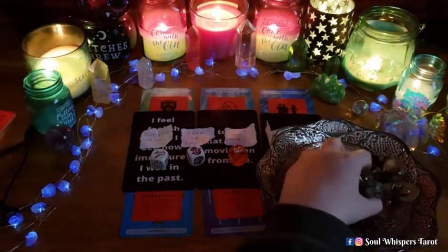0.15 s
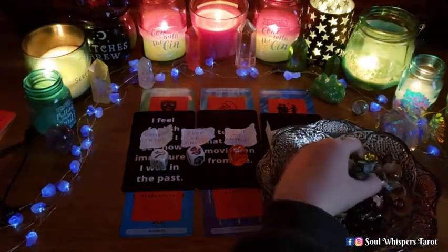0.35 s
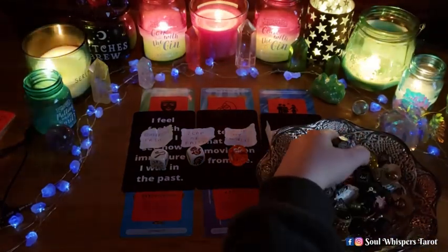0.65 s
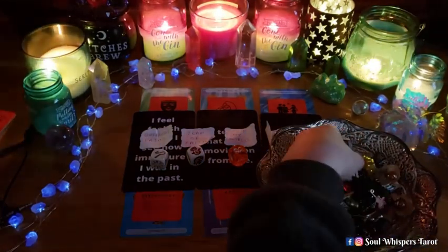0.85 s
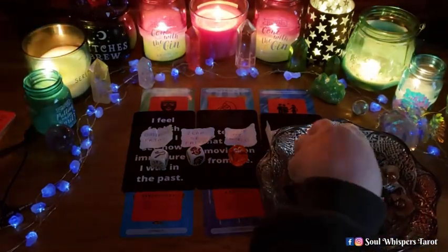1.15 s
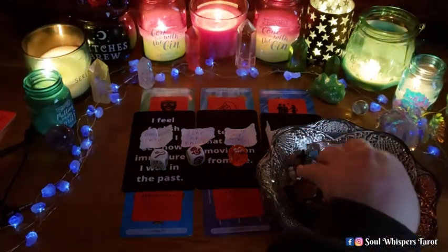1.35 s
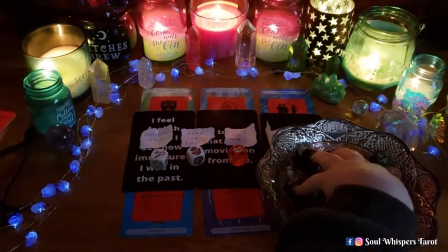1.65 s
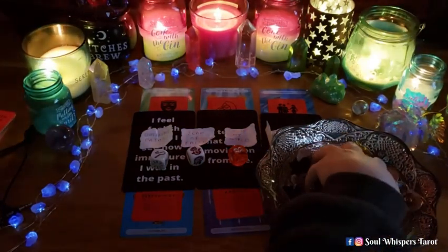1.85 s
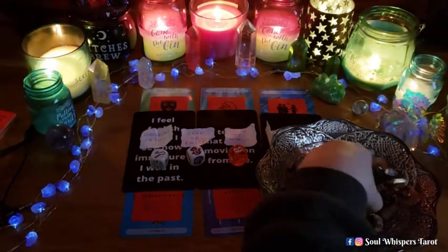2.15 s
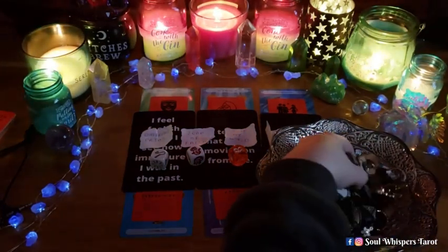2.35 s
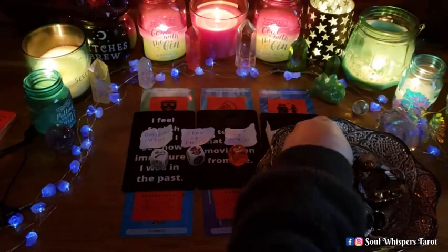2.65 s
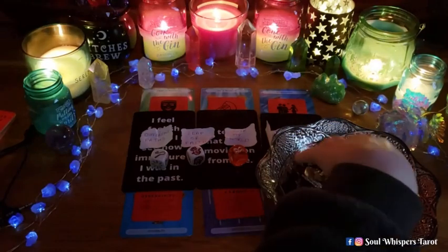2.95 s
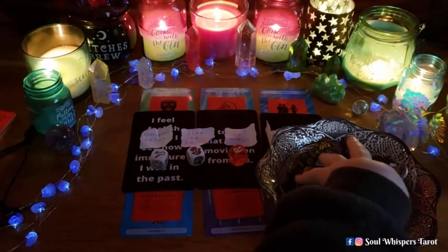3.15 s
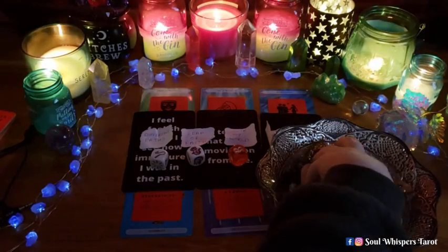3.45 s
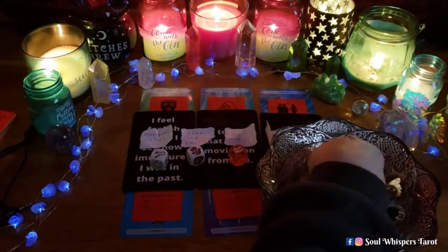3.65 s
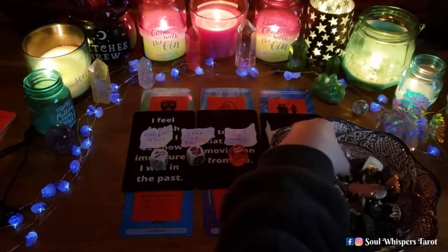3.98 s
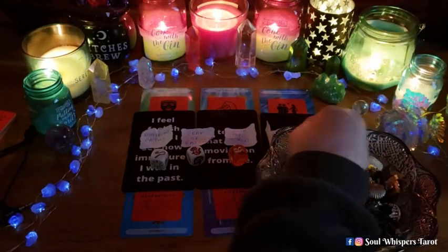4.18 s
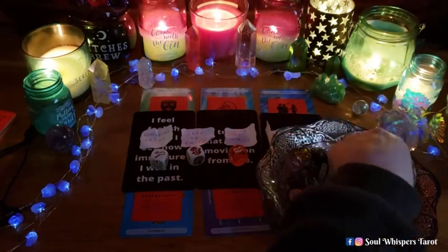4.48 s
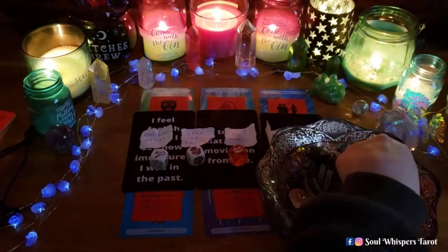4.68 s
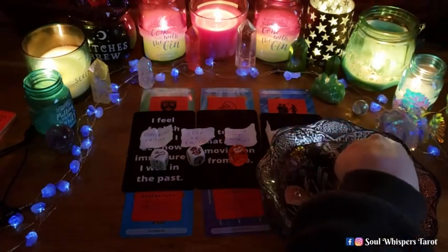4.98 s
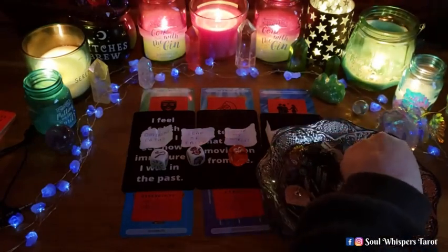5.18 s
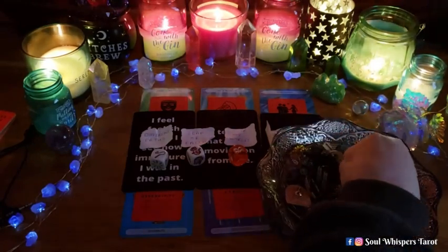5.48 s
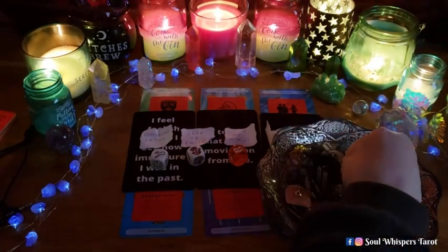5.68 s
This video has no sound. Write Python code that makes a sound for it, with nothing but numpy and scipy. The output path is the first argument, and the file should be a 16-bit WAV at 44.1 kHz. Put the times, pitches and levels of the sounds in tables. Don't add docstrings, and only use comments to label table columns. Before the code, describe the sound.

Fingers rake through small metal charms and stones in a glass bowl on a wooden table. Dense bright jingling starts at once, nearly stops after a second, then returns in uneven surges with hard clinks, stone clacks and dull thumps. It thins towards the end. Small quiet room, very close stereo microphones, brighter and nearer on the left, more reflected on the right.

```python
import sys
import numpy as np
from scipy import signal
from scipy.fft import rfft, irfft, next_fast_len
from scipy.io import wavfile

SR = 44100
rng = np.random.default_rng(int(sys.argv[2]) if len(sys.argv) > 2 else 0)


def to_wav(s):
    ch = np.atleast_2d(s).T
    pcm = np.round(np.clip(ch, -1, 1) * 32767)
    wavfile.write(sys.argv[1], SR, pcm.astype(np.int16))


def undo_db(level):
    steps = np.asarray(level, float) / 20
    return 10 ** steps


N = 256662

# frequency in Hz, level in dB, T60 in seconds.
GLASS_MODES = [(1092, -22, 0.14), (1257.4, -18, 0.18), (1730, -12.5, 0.094), (1680, -21, 0.06),
               (2850, -15.5, 0.055), (3017, -8.5, 0.049), (4393, -3.5, 0.053), (5970, -19.5, 0.1),
               (7600, -15.5, 0.037), (8570, -10, 0.062), (9420, -20, 0.13), (10900, -21, 0.083),
               (12810, -26, 0.07), (11800, -15, 0.088)]
# frequency in Hz, level in dB, T60 in seconds.
TABLE_MODES = [(75, -25, .12), (106, -6.5, 0.12), (128, 1.5, 0.11), (186, 10, 0.13), (236, -8, 0.052)]
# frequency in Hz, level in dB, T60 in seconds.
ROCKING_MODES = [(378.4, 4.5, 0.11), (450.5, 7, 0.054), (571.5, 4, 0.16), (739, 2, 0.047),
                 (878, 2.5, 0.029)]
# frequency in Hz, level in dB, T60 in seconds.
CHARM_MODES = [(9420, -1.5, 0.068), (9860, -4, .04), (10760, 0.5, 0.075), (11300, 3.5, 0.066),
               (11800, 3, 0.076), (12750, -6, .06), (13000, -8, 0.036), (13800, -4.5, .04),
               (14500, -1.5, .04), (15350, -5.5, .04)]
# frequency in Hz, level in dB per Hz.
CHARM_COLOUR = [(6500, -17.5), (7600, -10), (9000, -0.5), (9600, 3.5), (12300, 3.5), (14500, -6.5),
                (15800, -1.5), (17000, 2)]
# frequency in Hz, level in dB per Hz.
STONE_COLOUR = [(1290, -31), (2200, -15), (2920, -5.5), (4120, -1), (4310, -2), (5290, -8.5), (6230, -4),
                (8500, -8.5), (11000, -21), (18700, -120)]
# frequency in Hz, level in dB per Hz.
RUBBING_COLOUR = [(150, -21), (260, -35), (296, -45), (432, 3.5), (611, -2.5), (1720, 0), (2000, 0),
                  (2800, -10), (3640, -26.5), (6160, -120)]
# frequency in Hz, level in dB per Hz.
HUSH_COLOUR = [(18, -42), (30, 9), (124, 5), (616, -11), (2290, -25), (4650, -22), (7500, -26),
               (16000, -11)]
# frequency in Hz, left minus right in dB.
LEFT_LEAD = [(60, 3), (125, 0), (250, 3), (700, 5.5), (1290, 8), (2380, 5.5), (6000, 7), (9000, 13.5),
             (12500, 11), (15500, 4.5)]
LEFT_LAGS = [0, 3, 6, 9]
# frequency in Hz, level in dB.
TABLE_ECHO = [(200, 1), (255, -2.5), (300, -7.5), (350, 0.5)]
# start in seconds, length in seconds,
# charm level at the start in dB, charm level at the end in dB, depth of the dig in dB.
SWEEPS = [(0.04, 0.12, -27, -21, 2.5), (0.19, 0.21, -26, -25, 4.5), (0.452, 0.25, -30.5, -36, -0.5),
          (0.86, 0.267, -24, -19, 1.5), (1.32, .16, -56, -78, -3), (1.588, 0.31, -26.5, -24.5, 2.5),
          (1.952, 0.3, -26.5, -20.5, 1), (2.324, 0.15, -24, -34.5, 2.5), (2.736, 0.042, -23.5, -32.5, -3.5),
          (2.898, 0.058, -24, -26, 0.5), (3.184, 0.19, -20, -31, 1), (3.421, 0.13, -19.5, -28.5, 1.5),
          (3.827, 0.15, -19.5, -29, 0), (4.075, 0.13, -20, -22.5, -5), (4.263, 0.052, -29, -28.5, 1),
          (4.488, 0.11, -27, -23, 0), (4.607, 0.081, -22.5, -30, 0), (4.707, 0.31, -25.5, -34, 0),
          (5.079, 0.13, -34.5, -38.5, -0.5), (5.391, 0.018, -28.5, -33.5, 0), (5.443, 0.11, -37.5, -41, -5),
          (5.754, 0.046, -41.5, -47.5, 1)]
# time in seconds, charm level in dB, rise and fall in seconds
# for 10 dB, depth of the dig in dB.
TUMBLES = [(.004, -15, 0.082, 0.0821, 4.5), (0.125, -15, .004, 0.0461, 2), (.338, -18.5, 0.12, 0.05, -0.5),
           (0.543, -26.5, .004, -0.01, 6.5), (.79, -31, 0.03, -0.29, -7.5),
           (0.834, -22.5, 0.051, -0.1862, -2.5), (1.175, -31, .02, .03, 9), (1.215, -38, .01, .04, 2),
           (1.27, -41, .004, .024, 0), (3.053, -40, .003, 0.03, 0), (3.133, -36, .004, .47, 4.5),
           (5.385, -26, 0.012, -0.06, 3), (5.329, -38, 0.044, -0.25, 0), (5.705, -36, 0.027, -0.5, 5),
           (1.624, -27, 0.026, 0.15, -19), (1.932, -20.5, 0.064, 0.1551, 2), (2.7, -26.5, 0.038, 0.01, 5),
           (2.653, -21.5, 0.099, -0.05, 0), (2.81, -26, .006, 0.04, -4.5),
           (2.852, -12, 0.067, 0.0263, -3.5), (3.68, -20, 0.11, .13, 0.5), (4.03, -26, 0.045, 0.04, -2.5),
           (4.053, -22, .003, 0.04, -3), (5.266, -25.5, 0.069, 0.04, -1.5), (5.6, -33.5, 0.12, 0, -4),
           (5.669, -24, 0.067, -0.15, 0)]
# time in seconds, peak in dB, pitch of the struck piece in Hz,
# share on the glass in dB.
GLASS_KNOCKS = [(0.125, -5.5, 9420, 1), (0.2685, -14.5, 15000, 0), (1.073, -4.5, 9750, -4.5),
                (1.0884, -14, 10700, -14), (1.1004, -26, 10600, -21), (1.1987, -10.5, 12740, -12.5),
                (1.268, -28, 10800, -11), (1.5818, -16, 10700, -12), (1.6146, -11.5, 14900, -4),
                (2.0166, -8.5, 9420, -4.5), (2.1994, -12, 11700, -10), (2.7355, -6, 13500, -14),
                (2.7998, -8.5, 13700, -8), (2.8397, -11, 11900, -8), (2.9278, -13.5, 10300, -14),
                (3.1383, -18, 11100, -10.5), (3.1896, -6.5, 13100, -17), (3.3437, -20.5, 15000, -2),
                (3.4054, -20.5, 11300, -3), (3.678, -25, 15200, -3), (3.8374, -23, 12700, -1),
                (3.9602, -20.5, 15400, -1), (4.3949, -37, 10400, 6.5), (4.4265, -26.5, 5970, 2),
                (4.549, -23.5, 12900, -9), (5.189, -36, 15400, 1.5), (5.378, -32, 11300, 1)]
# time in seconds, peak in dB, pitch in Hz.
CHARM_KNOCKS = [(0.1644, -28, 9300), (0.3294, -24, 13700), (0.5392, -14.5, 8950), (0.647, -18, 11200),
                (0.772, -25, 14000), (0.846, -15, 10300), (1.046, -3.5, 9400), (1.506, -46, 14300),
                (3.052, -24, 13200), (1.5508, -21.5, 11800), (1.546, -28, 13400), (1.799, -35.5, 9370),
                (2.3494, -19, 14200), (2.601, -9.5, 9630), (2.6377, -3, 7130), (4.0499, -7.5, 13200),
                (4.0585, -17, 12660), (4.093, -8, 10100), (4.15, -10.5, 11430), (4.2, -16.5, 13500),
                (4.135, -12.5, 14500), (4.177, -11.5, 6870), (4.2732, -13.5, 14800), (4.469, -32, 10500),
                (4.4945, -25, 11700), (4.6, -16.5, 9410), (4.918, -22.5, 11700), (5.0786, -31, 14300),
                (4.7057, -20.5, 13600), (5.1997, -30, 12900), (2.3396, -15, 14800), (5.599, -22.5, 11900),
                (5.7538, -22, 15350)]
# start in seconds, length in seconds, pitch in Hz, level in dB.
STONE_ROLLS = [(0.385, 0.033, 3420, -34), (0.574, 0.036, 4170, -32), (0.691, 0.032, 4300, -37),
               (5.111, 0.027, 3600, -37), (5.2, 0.022, 4550, -33.5), (5.468, .04, 3930, -34.5),
               (0.854, 0.03, 4400, -24.5), (0.904, 0.03, 3740, -21.5), (1.029, 0.069, 4170, -22.5),
               (2.169, 0.094, 3750, -25), (2.28, 0.078, 3730, -24.5), (2.39, 0.09, 3730, -30.5),
               (3.419, 0.053, 3730, -23), (3.621, 0.17, 3720, -29), (3.895, 0.1, 3700, -28.5),
               (4.489, 0.045, 3850, -28), (4.535, 0.097, 3600, -26.5), (5.596, 0.046, 3500, -34.5)]
# start in seconds, length in seconds, level in dB.
PEBBLE_ROLLS = [
    (0.323, 0.046, -28),
    (2.601, 0.015, -23.5),
    (2.64, .04, -23),
    (2.736, 0.073, -25),
    (2.816, 0.078, -22.5),
    (4.057, 0.068, -21),
    (4.147, 0.054, -21),
    (5.607, 0.08, -39),
]
# start in seconds, pitch in Hz, T60 in seconds, level in dB.
RINGS = [(.004, 8400, 0.045, -26), (0.126, 4388, 0.2, -16), (1.59, 4100, 0.11, -31),
         (.127, 9420, 0.045, -15.5), (0.268, 4390, 0.15, -18.5), (.642, 11170, .12, -27),
         (.715, 11170, .1, -31), (0.22, 9000, 0.069, -33), (0.37, 15000, .06, -24),
         (.13, 8550, 0.06, -23.5), (1.07, 6330, 0.039, -17.5), (1.199, 13050, 0.12, -26),
         (1.2, 8250, .06, -36), (1.27, 2950, .2, -51), (1.29, 4390, .2, -54), (1.27, 900, .15, -60),
         (4.3, 12000, 0.14, -33), (2.4, 14000, 0.087, -23), (2.6, 14600, 0.055, -20),
         (2.32, 14700, .06, -23), (2.37, 14600, 0.04, -27), (2.43, 14500, .04, -31),
         (3.83, 4390, 0.052, -25.5), (3.765, 9700, 0.087, -31), (3.83, 11000, 0.058, -29),
         (3.5, 12810, 0.11, -29), (3.96, 15350, .06, -30), (2.8, 8800, 0.15, -29), (0.36, 9200, .07, -24),
         (4.59, 9420, .1, -27), (6.2, 9420, .06, -26), (5.4, 11700, .1, -35), (0.16, 1728, 0.086, -30),
         (0.32, 1728, .1, -37), (2.8, 1720, 0.053, -34), (3.8, 1728, 0.085, -32), (4.428, 1730, 0.065, -42),
         (3.4, 11000, .06, -27), (2.4, 12000, .15, -34), (.775, 14000, .06, -35),
         (2.016, 1740, 0.032, -23.5), (2.025, 4390, .08, -22), (2.017, 2980, 0.08, -26.5),
         (2.43, 9700, 0.091, -33), (2.93, 10350, 0.18, -28), (3.5, 12000, .2, -30),
         (4.19, 14000, 0.12, -22), (3.96, 8200, 0.14, -35), (1.07, 10700, 0.073, -14.5),
         (.86, 9420, 0.15, -22.5), (5.753, 5750, 0.034, -42.5), (5.75, 17000, .06, -27.5),
         (5.755, 9900, 0.053, -41), (5.62, 14700, 0.077, -25), (5.749, 15350, 0.055, -23.5)]
# start in seconds, pitch in Hz, level in dB.
SCUFFS = [
    (2.017, 3000, -20.5),
    (4.272, 1900, -23),
    (4.274, 1090, -32),
    (4.423, 3950, -29.5),
]
# start in seconds, length in seconds, level in dB.
SHOVES = [
    (1.148, 0.05, -45),
    (1.997, 0.26, -45),
    (2.81, .17, -41.5),
    (3.122, .1, -45.5),
    (4.178, 0.062, -43),
    (4.358, 0.046, -48),
    (4.75, 0.2, -43),
    (5.598, .11, -42),
]
# time in seconds, level in dB.
LEAN = [(0, -1.5), (.35, -1), (.75, -3.5), (1.0, 1.5), (1.18, 5), (1.27, -0.5), (1.55, 1), (1.9, 1),
        (2.2, 1.5), (2.5, 0.5), (2.8, 3.5), (3.15, 6.5), (3.5, -1.5), (3.8, 1.5), (4.2, 7), (4.42, 1.5),
        (4.6, 0.5), (5.3, -3), (5.82, -2)]
# time in seconds, peak in dB.
THUMPS = [(0.175, -32), (0.58, -28.5), (0.876, -28), (1.032, -25), (1.558, -32.5), (1.659, -34),
          (1.881, -28), (1.951, -25), (2.176, -30), (2.227, -27), (2.637, -25), (2.802, -24), (2.867, -23),
          (3.053, -31), (3.166, -27), (3.675, -34), (4.032, -31), (4.175, -25.5), (4.264, -28),
          (4.485, -31), (4.722, -32.5), (5.268, -44)]

SWEEP_RISE_S, SWEEP_FALL_S = 0.03, 0.037
USUAL_DB, GENTLE_DB = -24.5, -46
# dB re charms at a usual stir, dB won per dB gentler, dB won per dB of depth.
STONES, BOWL, WOOD = (-4, 0.21, 0.64), (-13, 0.46, 1), (-15, 0.58, 1.04)
BOWL_FEELS = 0.17
KNOCK_T60_S, CHARM_ON_GLASS_DB = 0.056, -22.5
STONE_T60_S, PEBBLE_HZ, PEBBLE_T60_S = 0.012, 6845, 0.012
CHATTER_S, SCUFF_S, SCUFF_T60_S, SHOVE_HZ, SHOVE_T60_S = 0.033, 0.009, 0.0032, 101.6, 0.2
THUMP_DB, HUSH_DB = -9, -67
ROOM_T60_S, ROOM_LEFT_DB, ROOM_RIGHT_DB = 0.18, -5, 11
BASS_CUT_HZ, TOP_HZ = 78.5, 15800


def rms(x):
    return np.sqrt(np.mean(x ** 2) + 1e-20)


def colour(x, points, share=1):
    size = next_fast_len(N)
    hz = np.maximum(np.arange(size // 2 + 1) * SR / size, 1)
    point_hz, point_db = np.transpose(points)
    db = np.interp(np.log(hz), np.log(point_hz), point_db)
    return irfft(rfft(x, size) * undo_db(share * db), size)[:N]


def ring(clicks, hz, t60):
    radius = undo_db(-60 / (max(t60, .001) * SR))
    turn = 2 * np.pi * hz / SR
    return signal.lfilter([0, np.sin(turn)], [1, -2 * radius * np.cos(turn), radius ** 2], clicks + 1e-18)


def wander(per_s, at=np.arange(N)):
    steps = rng.standard_normal(900)
    return np.interp(at * per_s / SR, np.arange(900), steps)


def level(x, gain, db):
    return x * rms(gain) / rms(x) * undo_db(db)


def train(events, db):
    clicks = np.zeros(N)
    clicks[(np.array(events)[:, 0] * SR).astype(int)] = undo_db(db)
    return clicks


def knock_rows():
    rows = GLASS_KNOCKS + [(s, db, hz, CHARM_ON_GLASS_DB) for s, db, hz in CHARM_KNOCKS]
    return [(s, db, hz, KNOCK_T60_S, glass_db) for s, db, hz, glass_db in rows]


def hand():
    now = np.arange(0, N, 32) / SR
    moves = [(s, length, db, end_db, SWEEP_RISE_S, SWEEP_FALL_S, depth)
             for s, length, db, end_db, depth in SWEEPS]
    moves += [(s, .001, db, db, rise, fall, depth) for s, db, rise, fall, depth in TUMBLES]
    weights = []
    for s, length, db, end_db, rise, fall, _ in moves:
        end = s + length
        times = [s - 3 * rise, s - 1.5 * rise, s, end, end + 10 * max(fall, .005)]
        move_db = np.interp(now, times, [db - 70, db - 15, db, end_db, end_db - 100])
        weights.append(undo_db(4 * move_db))
    weight = np.array(weights)
    total = weight.sum(axis=0)
    charm_db = 5 * np.log10(total)
    depth = np.array(moves)[:, -1] @ weight / total
    gentler = USUAL_DB - np.maximum(charm_db, GENTLE_DB)
    lean_db = np.interp(now, *np.transpose(LEAN))
    gains = []
    for (db, soft, deep), share in zip([(0, 0, 0), STONES, BOWL, WOOD], [0, 0, BOWL_FEELS, 1]):
        layer_db = charm_db + db + soft * gentler + deep * depth + share * lean_db
        gains.append(undo_db(np.interp(np.arange(N) / SR, now, layer_db)))
    return gains


def collisions(gain, per_s, spread_db, clump_db):
    born = rng.random(N) < per_s / SR
    sizes = undo_db(spread_db * np.minimum(rng.exponential(1, N), 3.5) + clump_db * wander(35.0))
    clicks = born * sizes * rng.choice([-1, 1], N)
    return gain * clicks / rms(clicks)


def heap(clicks, low_hz, high_hz, t60, turnover_db, count):
    dealt, out = rng.integers(0, count, N), np.zeros(N)
    for k, (place, damping) in enumerate(rng.random((count, 2))):
        hz = low_hz + (high_hz - low_hz) * (k + place) / count
        length = t60 * undo_db(8 * (damping - .5))
        hit, drive = np.flatnonzero(clicks * (dealt == k)), np.zeros(N)
        drive[hit] = clicks[hit] * undo_db(turnover_db * wander(9.0, hit))
        out += ring(drive, hz, length) / np.sqrt(length)
    return out


def body(clicks, modes, uneven_db):
    hit, out = np.flatnonzero(clicks), np.zeros(N)
    for hz, db, t60 in modes:
        drive = np.zeros(N)
        drive[hit] = clicks[hit] * undo_db(db + uneven_db * rng.standard_normal(len(hit)))
        out += ring(drive, hz, t60)
    return out


def charms(gain):
    fine = collisions(gain, 2000.0, spread_db=0.5, clump_db=2.0)
    single = collisions(gain, 300.0, spread_db=1.0, clump_db=3.0)
    pieces = heap(fine, 7500, 16200, 0.024, turnover_db=2.0, count=56)
    out = level(colour(pieces, CHARM_COLOUR), gain, -1.1)
    out += level(body(single, CHARM_MODES, uneven_db=4.0), gain, -3.5)
    return out + level(colour(fine, CHARM_COLOUR), gain, 2.26)


def stones(gain):
    coarse = collisions(gain, 2000.0, spread_db=3.4, clump_db=2.0)
    on_glass = collisions(gain, 250.0, spread_db=3.0, clump_db=5.0)
    pieces = heap(coarse, 2243, 8543, 0.028, turnover_db=1.5, count=32)
    out = level(colour(pieces, STONE_COLOUR), gain, -3.5)
    out += level(colour(coarse, STONE_COLOUR), gain, 0)
    return out + level(body(on_glass, GLASS_MODES, uneven_db=5.5), gain, -6.5)


def rocking_bowl(gain):
    dull = collisions(gain, 1500.0, spread_db=1.5, clump_db=0.5)
    out = level(colour(dull, RUBBING_COLOUR), gain, -1.76)
    out += level(body(dull, GLASS_MODES[:5], uneven_db=6.0), gain, -14.0)
    return out + level(body(dull, ROCKING_MODES, uneven_db=4.0), gain, -7.5)


def table_rumble(gain):
    pushes = collisions(gain, 500.0, spread_db=1.5, clump_db=-0.5)
    return level(body(pushes, TABLE_MODES, uneven_db=3.0), gain, -2.3)


def stirring():
    charm, stone, rock, wood = hand()
    settle = undo_db(-60 / (.12 * SR))
    rows = np.array(knock_rows())
    charm = charm + signal.lfilter([1], [1, -settle], train(rows, rows[:, 1] - 14))
    return charms(charm) + stones(stone) + rocking_bowl(rock) + table_rumble(wood)


def rattle_rows():
    return ([(s, length, hz, STONE_T60_S, db) for s, length, hz, db in STONE_ROLLS]
            + [(s, length, PEBBLE_HZ, PEBBLE_T60_S, db) for s, length, db in PEBBLE_ROLLS]
            + [(s, CHATTER_S, hz, t60, db) for s, hz, t60, db in RINGS]
            + [(s, SCUFF_S, hz, SCUFF_T60_S, db) for s, hz, db in SCUFFS]
            + [(s, length, SHOVE_HZ, SHOVE_T60_S, db) for s, length, db in SHOVES])


def rattles():
    out, rows = np.zeros(N), rattle_rows()
    for (s, length, hz, t60, db), luck in zip(rows, rng.standard_normal((len(rows), SR // 3))):
        at = int(s * SR)
        luck = np.r_[4, luck[1:]]
        run = luck * (np.abs(luck) > 2.3) * (np.arange(len(luck)) < length * SR)
        pair = ring(run, hz * (1 - 0.00029 / t60), t60) + ring(run, hz * (1 + 0.00027 / t60), t60)
        heard = undo_db(db) * pair / rms(pair[:int(length * SR)])
        out[at:at + len(run)] += heard[:N - at]
    return out


def knocks():
    out, rows = np.zeros(N), knock_rows()
    decay = np.arange(SR // 4) / SR
    for (s, db, hz, t60, glass_db), luck in zip(rows, rng.standard_normal((len(rows), len(decay)))):
        at = int(s * SR)
        tone = np.sin(2 * np.pi * hz * decay) * undo_db(-60 * decay / max(t60, .005) - 3.5)
        crack = np.diff(luck, prepend=0) * undo_db(-60 * decay / .005)
        echo = np.roll(crack, 90) * undo_db(-14.0)
        thud = ring(luck, 2160, 0.0023) * undo_db(-60 * decay / 0.097 + glass_db - 19.0)
        knock = undo_db(db) * (tone + crack + echo + thud)
        out[at:at + len(decay)] += knock[:N - at]
    rows = np.array(rows)
    return out + body(train(rows, rows[:, 1] + rows[:, 4]), GLASS_MODES, uneven_db=1.0)


def thumps():
    clicks = train(THUMPS, np.array(THUMPS)[:, 1] + THUMP_DB)
    push = signal.lfilter(np.hanning(90) / 45, [1], clicks)
    return sum(undo_db(db) * ring(push, hz, t60) for hz, db, t60 in TABLE_MODES)


def room(x, lag):
    s = np.arange(SR // 2) / SR
    tail = rng.standard_normal((2, len(s))) * undo_db(-60 * s / ROOM_T60_S) * (s > .0015)
    tail /= np.sqrt(np.sum(tail ** 2, axis=1, keepdims=True))
    tail *= undo_db([[ROOM_LEFT_DB], [ROOM_RIGHT_DB]])
    tail = signal.sosfilt(signal.butter(2, 280, "high", fs=SR, output="sos"), tail)
    tail[0, lag], tail[1, 0] = 1, 1
    tail /= np.sqrt(np.sum(tail ** 2, axis=1, keepdims=True))
    return signal.fftconvolve(x[None], tail, axes=1)[:, :N]


def background():
    hush = np.array([colour(n, HUSH_COLOUR) for n in rng.standard_normal((2, N))])
    return undo_db(HUSH_DB + np.array([[4], [-3]])) * hush / rms(hush)


def scene():
    bowl = colour(stirring(), TABLE_ECHO)
    single = rattles() + thumps()
    nearness = np.array([undo_db(8 * wander(120.0)) for place in LEFT_LAGS])
    shares = nearness / np.sqrt(np.sum(nearness ** 2, axis=0))
    heard = sum(room(bowl * share, lag) for share, lag in zip(shares, LEFT_LAGS))
    heard = heard + room(single, LEFT_LAGS[2]) + room(knocks(), LEFT_LAGS[0])
    left, right = heard
    softened = colour(right, LEFT_LEAD, share=-1.13)
    return np.array([undo_db(1.23) * left, undo_db(1.16) * softened]) + background()


def roll_off(x):
    return signal.sosfilt(signal.butter(12, 16810, fs=SR, output="sos"), x)


def record(dry):
    thin = signal.sosfilt(signal.butter(3, BASS_CUT_HZ, "high", fs=SR, output="sos"), dry)
    cut = signal.sosfilt(signal.ellip(12, .5, 70, TOP_HZ, fs=SR, output="sos"), thin)
    mix = np.clip(cut, -1, 1)
    return roll_off(mix)


dry = scene()
out = record(dry)
to_wav(out)
```